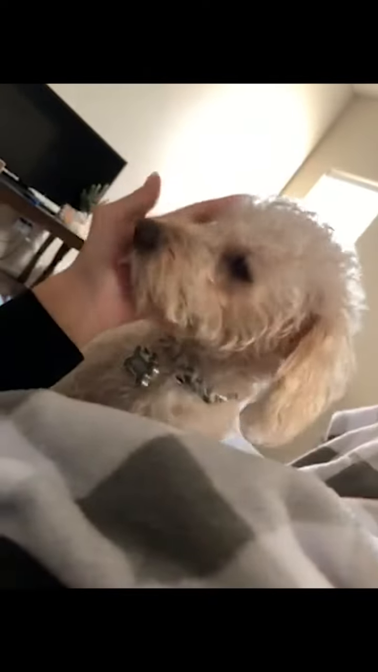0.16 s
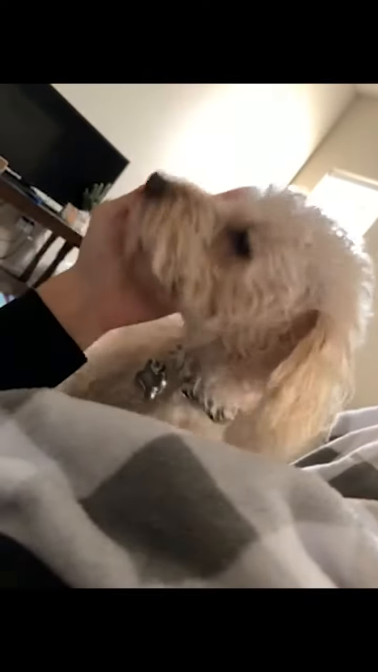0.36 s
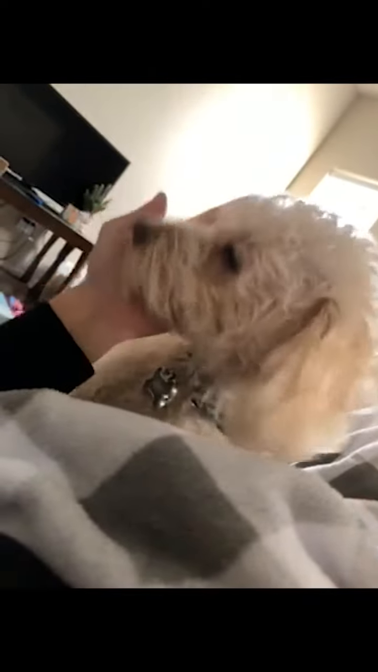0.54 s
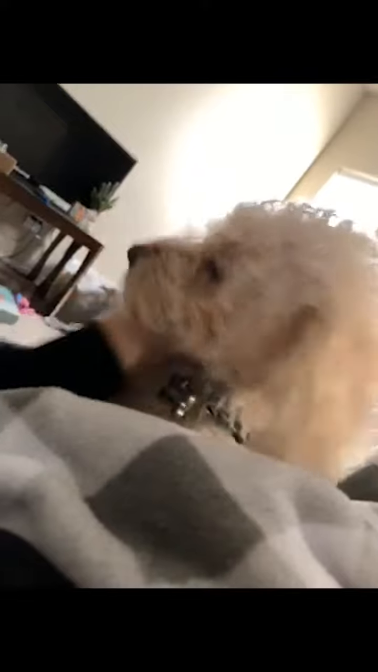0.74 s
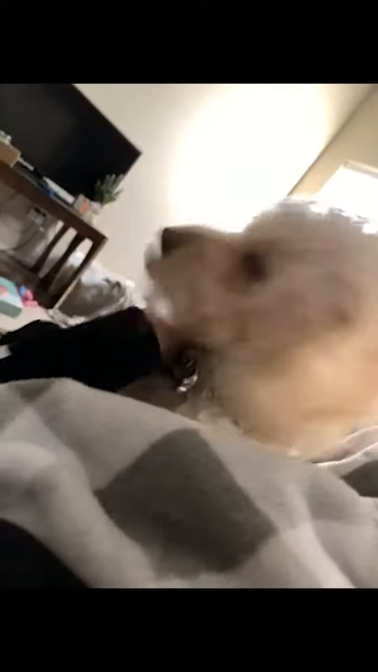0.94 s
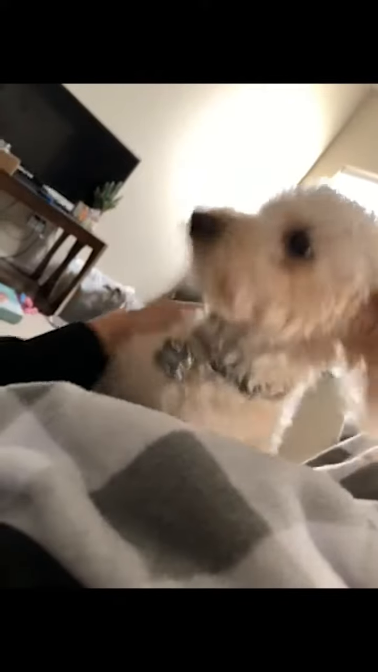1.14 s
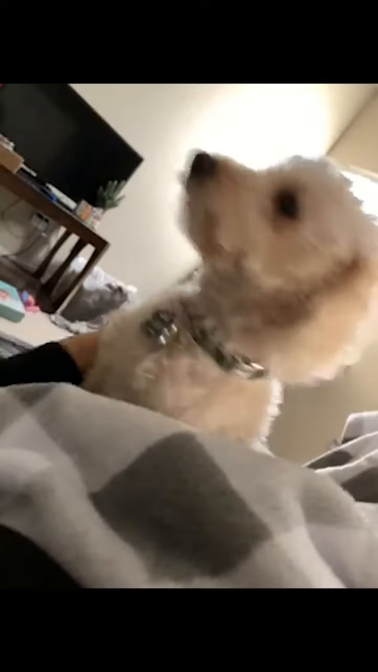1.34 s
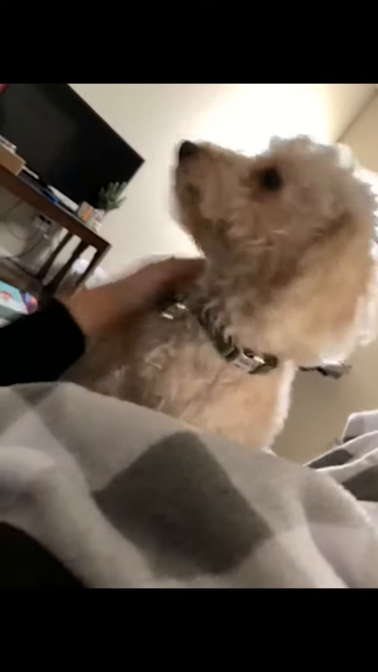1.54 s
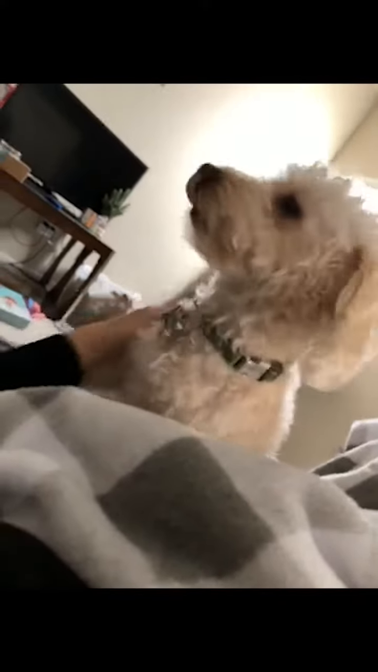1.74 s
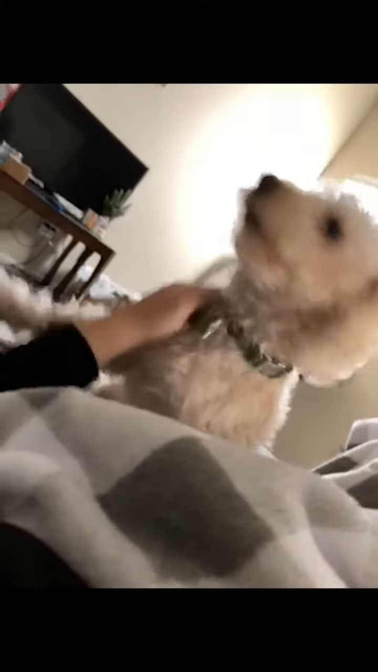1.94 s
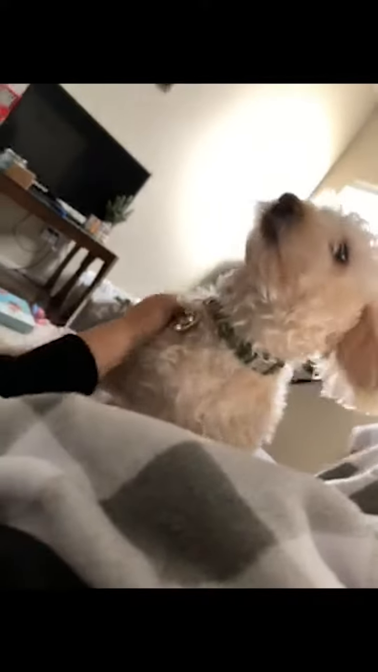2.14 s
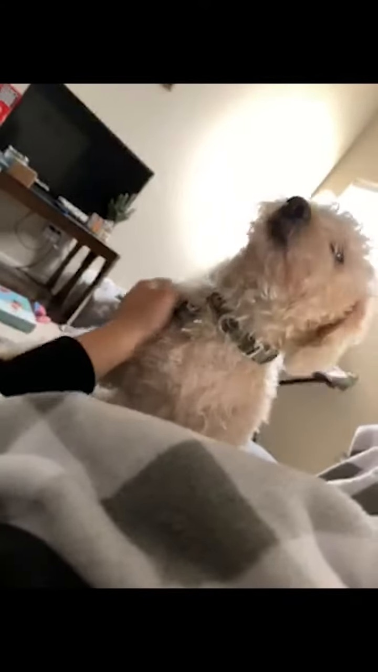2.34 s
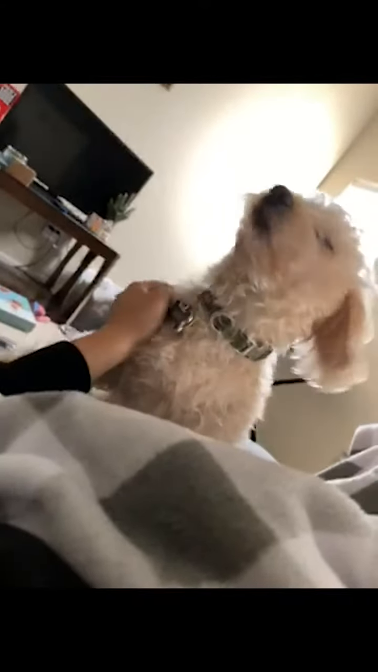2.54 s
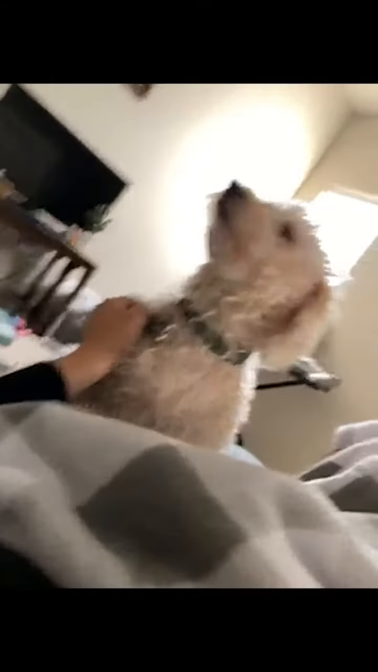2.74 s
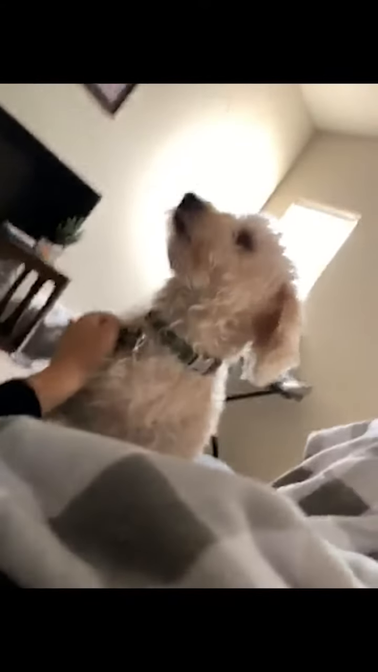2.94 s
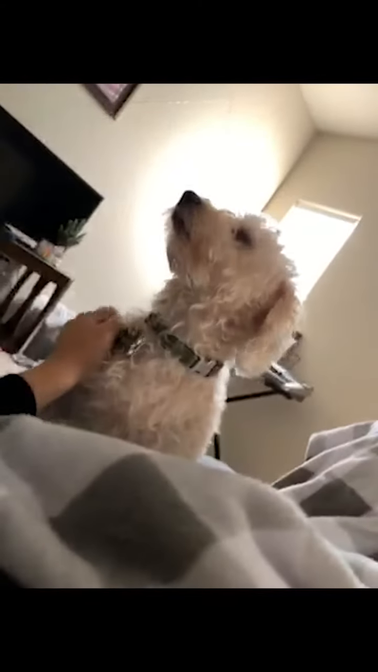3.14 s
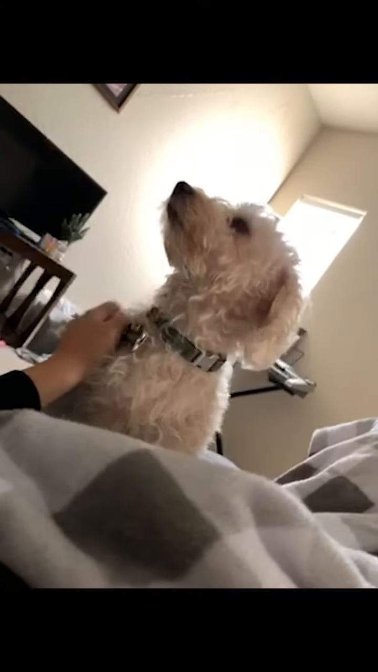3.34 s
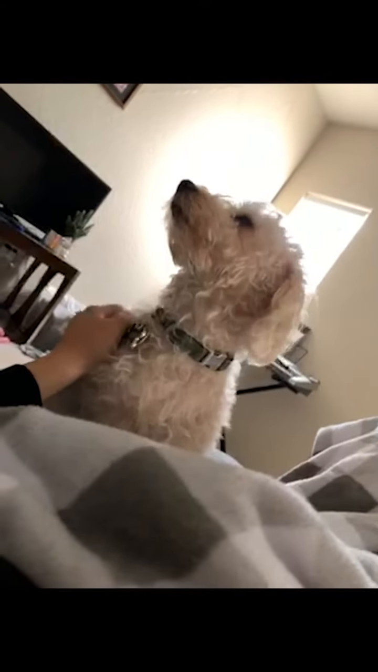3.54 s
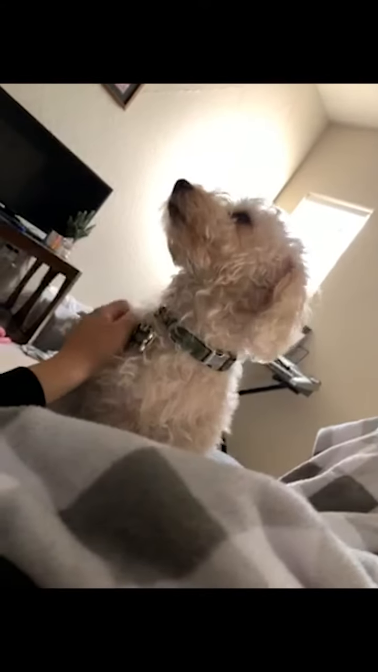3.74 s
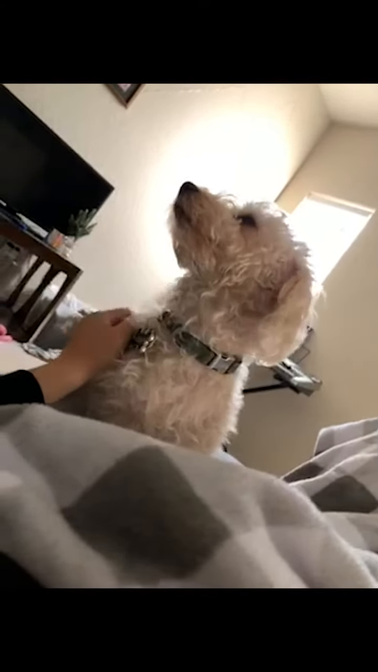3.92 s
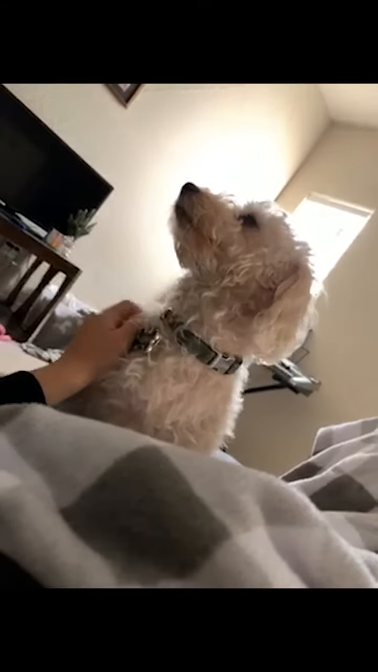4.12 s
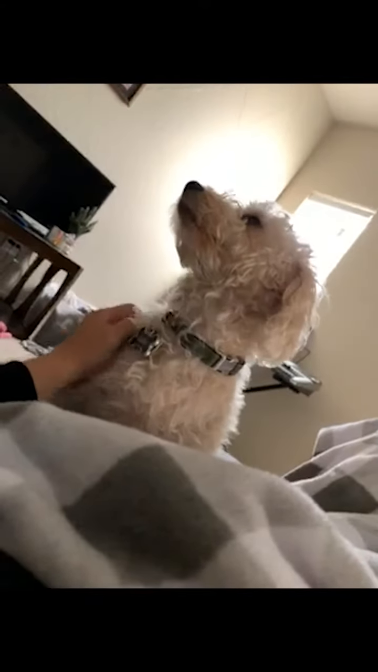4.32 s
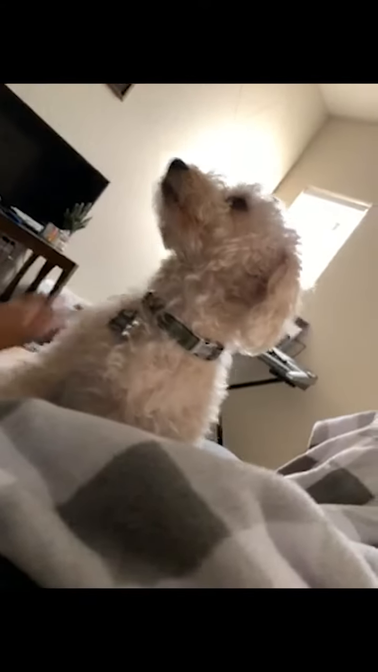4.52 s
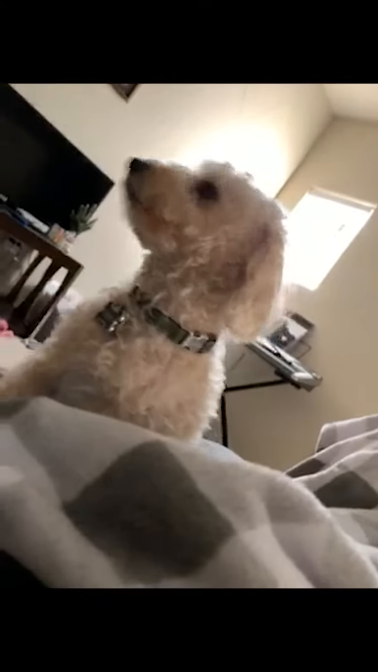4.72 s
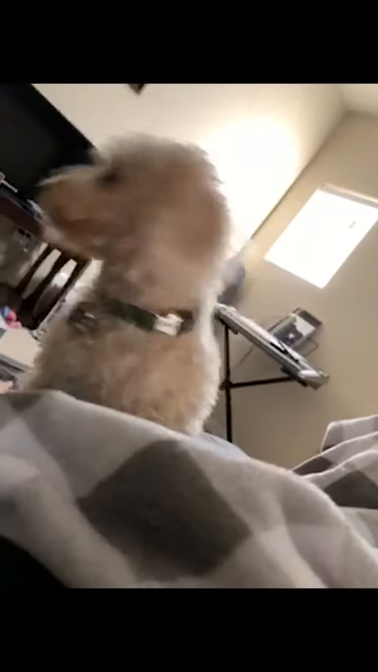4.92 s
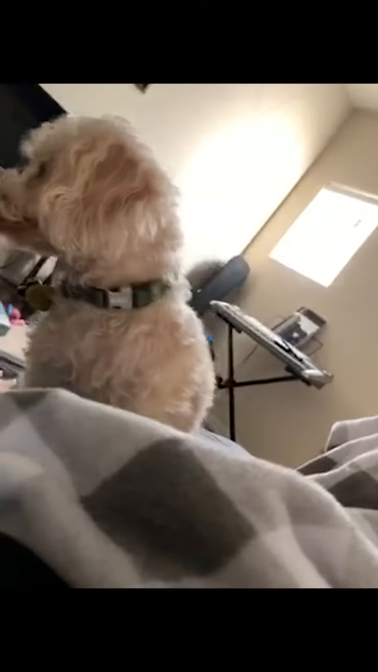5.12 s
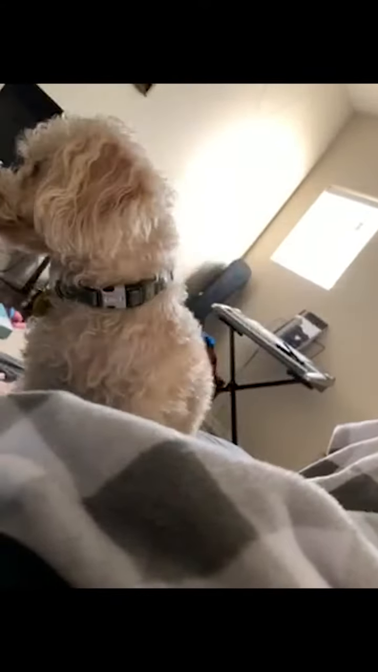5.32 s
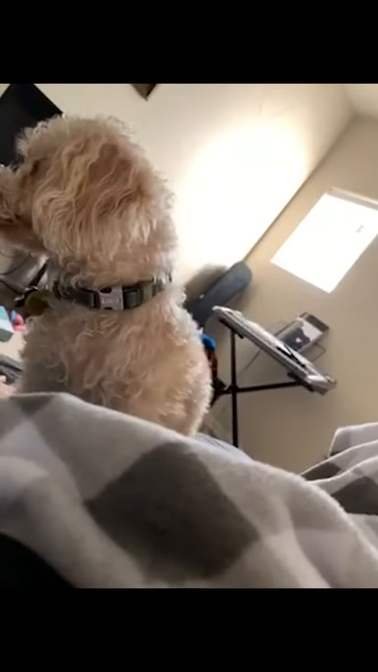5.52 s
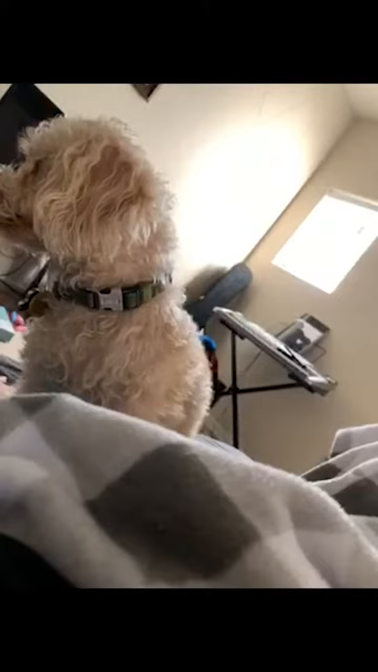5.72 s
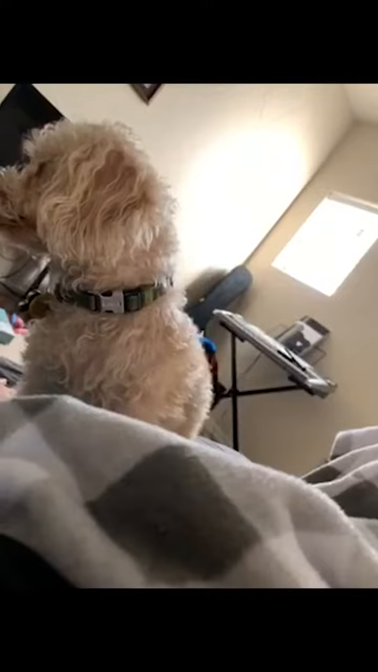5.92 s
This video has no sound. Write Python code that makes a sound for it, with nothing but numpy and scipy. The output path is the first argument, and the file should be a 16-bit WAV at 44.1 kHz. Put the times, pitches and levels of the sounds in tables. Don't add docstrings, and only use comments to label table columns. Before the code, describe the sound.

Brushing fur and dull bed bumps come first, with a few small metal ticks. The collar shakes and its tags rattle brightly and very briefly, loudest just before two seconds. Then only gentle, separate strokes and faint hiss remain. Small bumps gather before a deep, overloaded blow on the mattress, followed by blanket rustle, a tiny creak and near silence. Everything is close and dry, in a soft furnished room.

```python
import sys
import numpy as np
from scipy import signal
from scipy.fft import rfft, irfft
from scipy.io import wavfile
from scipy.ndimage import uniform_filter1d

SR = 44100
rng = np.random.default_rng(int(sys.argv[2]) if len(sys.argv) > 2 else 0)


def waveform_to_disk(signal):
    frames = np.transpose(np.atleast_2d(signal))
    scaled = np.clip(frames, -1, 1) * 32767
    samples = np.round(scaled).astype(np.int16)
    wavfile.write(sys.argv[1], SR, samples)


def makeup_ratio(level_db):
    decades = np.asarray(level_db, float) / 20
    return 10 ** decades


N = 263316

# (peak time [s], length [s], level [dB], pressure [dB])
STROKES = [(0.021, 0.079, -43.5, 8.5), (.2, 0.23, -61, 8.5), (.36, 0.14, -56, -6), (.68, 0.056, -52, -5.5),
           (.852, 0.094, -54, -3.5), (1.005, 0.11, -46.5, 1.5), (1.12, .16, -46.5, 0.5),
           (1.22, 0.28, -52, -5.5), (1.345, 0.1, -49, 0.5), (1.53, 0.097, -44, 1),
           (1.589, 0.082, -41.5, 4.5), (1.675, 0.056, -43.5, -2), (1.73, 0.074, -35, 1.5),
           (1.79, 0.11, -41.5, 0), (1.958, 0.1384, -39, 0), (2.07, 0.081, -42.5, 2),
           (2.14, 0.19, -45.5, -6), (2.43, 0.17, -50.5, -3), (2.655, 0.098, -58, -8),
           (2.776, 0.11, -51, -4), (2.87, 0.1, -56.5, 9.5), (3.211, 0.19, -53, -3), (3.606, .12, -48, -3),
           (3.953, 0.12, -48.5, -2.5), (4.187, 0.068, -60, -9), (4.334, 0.13, -51, -3.5),
           (4.453, 0.11, -51.5, -5), (4.62, 0.091, -61, 13), (4.75, 0.14, -54, 10),
           (4.92, 0.21, -63.5, 14.5)]
STROKE_RISE, STROKE_REST_DB = 0.49, -72
CREAK_SPREAD, CREAK_TONE = 7, 1.1


def evened(x):
    return x / np.sqrt(np.mean(x ** 2) + 1e-20)


def read(points, hz, column=1):
    table = np.transpose(points)
    return np.interp(np.log(hz + 1), np.log(table[0] + 1), table[column])


def add(mix, s, sound):
    part = mix[round(s * SR):][:len(sound)]
    part += sound[:len(part)]


def colour(x, spectrum):
    gain = makeup_ratio(read(spectrum, np.fft.rfftfreq(len(x), 1 / SR)))
    return evened(irfft(rfft(x) * gain, len(x)))


def lumpy(depth_db, ms):
    width = int(ms * SR / 1000)
    wander = uniform_filter1d(uniform_filter1d(rng.standard_normal(N), width), width)
    return rng.standard_normal(N) * makeup_ratio(depth_db * evened(wander))


def patchy(x, depth_db):
    z = signal.stft(x, nperseg=256)[2]
    field = uniform_filter1d(rng.standard_normal(z.T.shape), 8, 0)
    field = uniform_filter1d(field, 6, 1).T
    return evened(signal.istft(z * makeup_ratio(depth_db * evened(field)), nperseg=256)[1][:N])


def ring(x, hz, width_hz):
    r = np.exp(-np.pi * width_hz / SR)
    y = signal.lfilter([1, 0, -1], [1, -2 * r * np.cos(2 * np.pi * hz / SR), r * r], x)
    return y / abs(y).max()


def onset(t, rise_ms):
    return 1 - np.exp(-(t / rise_ms * 1000) ** 2)


def glide(db, above_hz, hz, glide_ms, t60, rise_ms):
    t, tau = np.arange(SR // 3) / SR, glide_ms / 1000
    turns = hz * t + above_hz * tau * (1 - np.exp(-t / tau))
    return makeup_ratio(db - 60 * t / t60) * np.sin(2 * np.pi * turns) * onset(t, rise_ms)


def swells(rows, db, rise, rest_db, square=1.71):
    t, power = np.arange(0, N + 64, 64) / SR, makeup_ratio(2 * rest_db)
    for (s, length, *_), level_db in zip(rows, db):
        u = (t - s) / length
        distance = abs(np.where(u < 0, u / rise, u / (1 - rise)))
        power = power + makeup_ratio(2 * level_db - 18.1 * distance ** square)
    return np.interp(np.arange(N) / SR, t, np.sqrt(power))


def swishes(rows, spread, tone=0):
    out = np.zeros(N)
    for (s, length, db, start_hz, end_hz), z in zip(rows, rng.standard_normal((len(rows), SR // 4))):
        n, r = int(length * SR), np.exp(-np.pi * spread * np.sqrt(start_hz) / SR)
        turn = np.exp(2j * np.pi * np.cumsum(np.geomspace(start_hz, end_hz, n)) / SR)
        fuzz = signal.lfilter([1], np.convolve([1, -r], [1, -r]), z[:n] / turn)
        size = abs(fuzz)
        band = evened((turn * (evened(size) * fuzz / size + tone)).real)
        fade = signal.windows.tukey(n, .5) * np.linspace(1.3, .6, n)
        add(out, s, makeup_ratio(db) * band * fade)
    return out


def tags():
    # (time [s], level [dB], ring [Hz], contact [ms])
    face = [(0.108, -38, 6670, 2.4), (0.6766, -20, 7330, 0.7), (1.098, -14.5, 6400, 0.45),
            (1.1, -19.5, 6300, 3.3), (1.1115, -18.5, 6600, 3.6), (1.115, -12.5, 6650, 0.58),
            (1.7149, 0.5, 7300, 1.3), (1.8023, 4, 6800, 0.61), (1.8205, -22, 7200, 2.3),
            (1.9678, -10, 6770, 6.3), (1.9735, -5, 6700, 1.9), (2.354, -30, 6360, 1.1),
            (2.3811, -27, 5500, 2.3)]
    # (time [s], level [dB], ring [Hz], contact [ms])
    edge = [(0.017, -27, 4530, 1.1), (0.1869, -35, 8000, 1.4), (0.7388, -36, 6740, 1.7),
            (0.8633, -30.5, 8000, 1.1), (0.8727, -36, 7840, 1.4), (1.649, -20.5, 9640, 0.7),
            (1.7208, 1, 6300, 1.3), (1.8025, -19.5, 5000, 1.596), (1.8083, -21.5, 7700, 1.8),
            (1.971, -19, 7060, 5), (2.0483, -7.5, 7700, 3.41), (2.0623, -11, 6060, 1.4),
            (2.0815, -23.5, 6510, 2.1)]
    # (time [s], level [dB], ring [Hz], contact [ms])
    slap = [(0.6599, -38, 7800, 1.8), (0.671, -41, 7150, 1.7), (1.0273, -16.5, 6800, 3.2),
            (1.658, 4.5, 6950, 4.4), (1.7095, 10.5, 6890, 4.2), (1.749, -17, 7400, 2.2),
            (1.786, -16.5, 6400, 0.95), (1.9466, -28, 6500, 1.4), (2.0066, -18.5, 7040, 4.6),
            (2.056, -10.5, 6540, 4.4), (2.065, -22, 6500, 2.5), (2.068, -23, 6070, 1.1),
            (2.1082, -13, 7060, 1.2), (2.141, -22.5, 6630, 1.4)]
    # (time [s], level [dB], ring [Hz], contact [ms])
    dull = [(0.1422, -40, 2900, 2.1), (0.657, -48, 6160, 4.2), (1.7231, -23.5, 6280, 8.9),
            (1.9964, -40, 5810, 1.6), (2.5294, -49, 5560, 1.7), (2.8748, -44, 6200, 0.64)]
    # (thud over ring [dB], fizz over ring [dB], rise [ms], opening blow [ratio])
    kinds = [
        (-18.5, -28.5, .6, 1.44),
        (-30, -10, .3, 3.4),
        (-13, -20.5, 0.37, 2.2),
        (6, -5, 0.26, 2.8),
    ]
    # (time [s], peak [dB], note [Hz], t60 [ms])
    ticks = [(0.234, -50, 5100, 30), (.362, -40, 6900, 15), (0.656, -34.5, 3070, 13),
             (1.084, -33, 2050, 14), (1.6602, -19, 7200, 4.9), (1.68, -17, 5930, 6), (1.689, -19, 7000, 10),
             (1.6975, -17, 6460, 10), (1.701, -11, 7300, 8.2), (1.706, -22, 6800, 12), (1.7149, 1, 7000, 4),
             (1.789, -13, 2700, 4.2), (1.802, -11.5, 14800, 3.5), (1.9688, -19, 7300, 5.3),
             (1.9966, -11, 2100, 4.9), (2.004, -25, 5200, 7), (2.007, -24, 2300, 11),
             (2.0355, -35, 6000, 8), (2.04, -29, 6600, 8), (2.052, -30, 3500, 9.9), (2.059, -20, 5440, 16),
             (4.531, -48.5, 1300, 18), (4.562, -33.5, 1260, 16), (4.588, -36, 1170, 22),
             (4.62, -39, 1150, 22), (4.651, -33, 1170, 22), (5.093, -39, 1480, 14), (5.113, -40, 944, 16),
             (2.11, -35, 3700, 7.5), (2.14, -26, 5470, 11), (2.214, -48, 4080, 59),
             (2.238, -44.5, 4040, 39), (2.048, -17.5, 2100, 6.4),
             (1.659, -14, 9050, 4), (1.658, -15, 13700, 4.5), (1.7163, -2.5, 7100, 6),
                 (1.7205, -10.5, 14900, 5), (1.7205, -8.5, 9300, 5), (1.7245, -14.5, 6500, 6),
                 (1.786, -19, 8600, 5), (1.791, -17, 3280, 9), (1.8015, -5, 15560, 5),
                 (1.8015, -12.5, 10900, 5), (1.8017, -8.5, 13440, 4.6), (1.804, -17.5, 2400, 7.5),
                 (1.808, -22, 13600, 4), (1.931, -21, 6550, 6), (1.938, -30, 6000, 6),
                 (1.9466, -28, 8500, 5), (1.9664, -10, 11500, 6), (1.9715, -22, 15000, 6),
                 (1.9745, -18, 4300, 8.7), (1.985, -30, 14000, 4), (2.007, -27, 9000, 8),
                 (2.048, -6, 15020, 6), (2.049, -11, 11500, 7), (2.048, -11, 9400, 7.3),
                 (2.062, -14, 15000, 5), (2.062, -20, 9000, 5), (2.0815, -26, 9300, 6),
                 (2.108, -18, 9200, 5.4), (2.141, -22, 9600, 4), (2.141, -23, 3880, 8),
                 (2.146, -45, 5000, 60), (2.15, -42, 4000, 50), (.1427, -29, 3700, 9.2),
                 (.33, -45, 5400, 30)]
    out, t = np.zeros(N), np.arange(700) / SR
    for rows, (thud_db, fizz_db, rise_ms, blow) in zip([face, edge, slap, dull], kinds):
        noises = rng.standard_normal((len(rows), 3, len(t)))
        for (s, db, hz, ms), (a, b, c) in zip(rows, noises):
            contact = np.exp(-(t / (0.32 * ms / 1000)) ** 1.2) + 0.03 * np.exp(-t / 0.0061)
            contact = contact * onset(t, rise_ms)
            first = blow * (t < 1.5 / SR)
            note = ring(ring(a * contact + first, hz, 1099.4), hz, 2920)
            push = np.diff(b * contact + 0.4 * first, prepend=0)
            thud = ring(ring(push, 4450, 2817), 3640, 2900)
            fizz = ring(ring(c * contact ** 1.4 + 0.43 * first, 13500, 8000), 11000, 9000)
            add(out, s, makeup_ratio(db) * (note + makeup_ratio(thud_db + 2.5) * thud + makeup_ratio(fizz_db + 12.0) * fizz))
    t = np.arange(SR // 8) / SR
    for s, db, hz, t60_ms in ticks:
        add(out, s, makeup_ratio(db - 60000 * t / t60_ms) * np.sin(2 * np.pi * hz * t) * (1 - np.exp(-t / 0.000866)))
    return out


def rolls():
    # (peak time [s], level [dB], note [Hz], half width [ms])
    rolling = [(1.9669, -5.5, 6850, 0.5), (1.9742, -8, 6600, .6), (2.1086, -8, 7100, 0.46),
               (2.1086, -23, 4400, .4), (2.1086, -18, 5900, .5), (2.0563, -24.5, 3400, 0.47),
               (2.0484, -6, 8300, 0.28), (1.7208, -6.5, 9300, 0.401), (1.6581, -7.5, 11500, 0.13),
               (2.0052, -27, 5500, .6), (2.1416, -19, 6800, 0.57), (2.1416, -23.5, 5500, .8),
               (1.7493, -15, 6800, .35), (2, -18.5, 6500, .6), (2.0573, -15.5, 6500, 1),
               (2.0818, -27, 6500, 0.83), (1.9471, -25, 6500, .6), (2.3812, -30, 5150, 0.96),
               (2.3546, -33.5, 6260, 0.88), (.0172, -32, 4380, 1.1), (0.0165, -34, 5400, 1),
               (.0172, -35, 7000, 1), (.1435, -36, 2900, 0.7), (.1088, -42, 6500, 1.4),
               (1.7101, -14.5, 2600, 1.1), (1.7101, -18.5, 1400, 1.1), (1.69, -25, 7200, 0.59),
               (1.7137, -7, 7000, .35), (1.7166, -7, 7100, .6), (2.875, -40.5, 10300, .5),
               (2.875, -46, 6000, 0.76), (.6768, -28, 10200, .3)]
    out, t = np.zeros(N), np.arange(-150, 250) / SR
    for s, db, hz, ms in rolling:
        swell = np.exp(-(t / np.where(t < 0, 1, 1.5) / ms * 1000) ** 2)
        add(out, s + t[0], makeup_ratio(db) * swell * np.cos(2 * np.pi * hz * t))
    return out


def bedroom(x):
    t = np.arange(SR // 4) / SR
    tail = rng.standard_normal(len(t)) * makeup_ratio(-60 * t / 0.323) * (t > .003)
    return signal.fftconvolve(x, tail / np.linalg.norm(tail))[:N]


def rattle():
    level = swells(STROKES, np.transpose(STROKES)[2], STROKE_RISE, STROKE_REST_DB)
    shaken = np.clip((20 * np.log10(level) + 51.0) / 14, 0, 1.5)
    draw, size, which = rng.random(N), rng.exponential(1, N), rng.integers(0, 6, N)
    struck = draw < 260 * shaken / SR
    hits = struck * level * makeup_ratio(6.5 + 2.57 * np.minimum(size, 1.5))
    t, out = np.arange(300) / SR, np.zeros(N)
    for k, hz in enumerate([4900, 5930, 6400, 6800, 7060, 7950]):
        tap = makeup_ratio(-60 * t / 0.0025) * np.sin(2 * np.pi * hz * t) * (1 - np.exp(-t / 0.00027))
        out += signal.oaconvolve(hits * (which == k), tap)[:N]
    return out


def fur():
    # (frequency [Hz], level [dB])
    low = [(700, -33), (1400, -6.5), (2200, -3), (3600, -6.5), (5200, -17)]
    # (frequency [Hz], level [dB])
    mid = [(3800, -12.5), (5100, -5), (5900, -0.5), (7000, -2.5), (7900, -4.5), (8800, -9), (11000, -62.5)]
    # (frequency [Hz], level [dB])
    high = [(7500, -34), (9500, -2.5), (12500, -5.5), (16000, -9), (18000, -38.5)]
    slips, drag = patchy(lumpy(2.2, 2.5), 2.4), patchy(lumpy(2.2, 4), 2.2)
    db, pressure_db = np.transpose(STROKES)[2:]
    drag_db, fizz_db = db - 4.5 + pressure_db, db - 8.5 - pressure_db
    mix = swells(STROKES, db, STROKE_RISE, STROKE_REST_DB) * colour(slips, mid)
    mix += swells(STROKES, drag_db, STROKE_RISE, STROKE_REST_DB - 7.0) * colour(drag, low)
    return mix + swells(STROKES, fizz_db, STROKE_RISE, STROKE_REST_DB + 1.5) * colour(slips, high)


def thump():
    # (time [s], peak [dB], start above settled note [Hz], settled note [Hz], t60 [s])
    waves = [
        (4.7325, 3, 48, 234, 0.044),
        (4.7368, -3.5, 70, 531, 0.045),
        (4.7436, 4, 238, 62.1, 0.13),
        (4.744, -0.5, 85, 158.5, 0.15),
        (4.7547, -6, 10, 109.2, 0.096),
        (4.761, -13, 6.4, 60.15, 0.97),
        (4.7636, 4.5, 6.7, 80, 0.075),
        (4.914, -12.5, 27, 83, 0.34),
    ]
    # (frequency [Hz], level [dB], t60 [s])
    tail_bands = [(58, -13.5, 0.41), (243, -14.5, 0.29), (613, -24, 0.11), (1200, -40.5, 0.41),
                  (3000, -45, 0.28), (7000, -65.5, 0.059)]
    out = np.zeros(N)
    for s, db, above_hz, hz, t60 in waves:
        add(out, s, glide(db, above_hz, hz, 3.3, t60, 0.435))
    hz, t, z = signal.stft(rng.standard_normal(SR // 2), SR, nperseg=512)
    t60 = read(tail_bands, hz, column=2)[:, None]
    z = z * makeup_ratio(read(tail_bands, hz)[:, None] - 60 * t / t60)
    tail = signal.istft(z, SR, nperseg=512)[1]
    t, bass = np.arange(len(tail)) / SR, uniform_filter1d(uniform_filter1d(tail, size=40), size=40)
    crack = (tail - bass) * (1 + 1.53 * np.exp(-t / 0.016)) * np.minimum(t / 0.0074, 1)
    boom = bass * np.minimum(t / 0.0071, 1) ** 2
    add(out, 4.727, makeup_ratio(23.0) * (crack + boom))
    return out


def bed():
    # (peak time [s], length [s], mattress shake [dB], blanket rustle [dB])
    shifts = [(0.108, 0.45, -31, -44.5), (0.42, 0.06, -29.5, -39.5), (0.513, 0.073, -33, -36.5),
              (0.604, 0.11, -31, -31), (0.817, 0.28, -30, -40.5), (1.009, 0.18, -32.5, -37),
              (1.11, 0.14, -27, -38), (1.387, 0.32, -31, -35.5), (1.55, 0.1, -33.5, -36.5),
              (1.724, 0.25, -30.5, -44.5), (1.871, 0.09, -31, -49.5), (1.985, 0.16, -36, -49),
              (2.166, 0.25, -31.5, -35.5), (2.29, 0.52, -33.5, -47), (2.59, 0.23, -31.5, -46.5),
              (2.815, 0.3, -32.5, -48.5), (3.25, 0.23, -30.5, -60), (3.598, 0.23, -34, -50),
              (3.856, 0.37, -33, -53.5), (4.065, 0.056, -29.5, -53.5), (4.345, 0.65, -36, -54),
              (4.567, .16, -27, -37.5), (4.648, 0.14, -29, -35), (4.758, 0.12, -30, -20),
              (4.851, .2, -23, -29.5), (5.106, 0.22, -26, -34.5), (5.434, 0.24, -37, -56),
              (5.675, 0.12, -51, -61.5), (5.761, 0.022, -38.5, -63), (5.945, 0.13, -40, -56)]
    # (frequency [Hz], level [dB])
    shake = [(18, -53), (32, -40), (40, -20), (58, 7), (80, 2.5), (125, -6), (170, -15.5), (300, -52)]
    # (frequency [Hz], level [dB])
    rustle = [(30, -22), (90, 9.5), (170, 9.5), (300, 4.5), (500, -4.5), (900, -18), (1600, -27.5),
              (3000, -59)]
    # (time [s], peak [dB], settled note [Hz], t60 [s])
    knocks = [(0.402, -19, 226, 0.044), (0.49, -24, 215, 0.075), (0.557, -23, 250, 0.069),
              (0.595, -19, 218, 0.075), (0.614, -45, 213, 0.044), (0.966, -32, 227, 0.11),
              (1.1, -22, 277, 0.05), (1.296, -27, 322, 0.098), (1.342, -27, 283, 0.098),
              (1.4, -24.5, 298, 0.097), (1.462, -28, 375, 0.092), (1.521, -22.5, 231, 0.055),
              (1.542, -21, 243, 0.067), (2.104, -31.5, 330, 0.081), (2.194, -36.5, 207, 0.059),
              (2.571, -29, 295, 0.093), (2.731, -31.5, 203, 0.1), (4.532, -20.5, 293, 0.069),
              (4.564, -23, 312, 0.088), (4.59, -23.5, 305, 0.072), (4.62, -23, 280, 0.095),
              (4.654, -22.5, 337, 0.063), (4.711, -22, 263, 0.045), (5.036, -38, 298, 0.035),
              (5.053, -30, 282, 0.041), (5.148, -34, 302, 0.094), (5.114, -18, 257, 0.06),
              (5.195, -29.5, 228, 0.062)]
    rise, still_shake_db, still_rustle_db = 0.369, -42, -55.5
    shake_db, rustle_db = np.transpose(shifts)[2:]
    out = swells(shifts, shake_db, rise, still_shake_db, 1.6) * colour(lumpy(0.89, 21), shake)
    folds = colour(lumpy(3.5, 5), rustle)
    out += swells(shifts, rustle_db + 1.5, rise, still_rustle_db, 2.03) * folds
    t = np.arange(SR // 8) / SR
    for (s, db, hz, t60), z in zip(knocks, rng.standard_normal((len(knocks), len(t)))):
        add(out, s, glide(db + 12.5, 1625, 1.052 * hz, 1.246, 0.4 * t60, 4.72))
        burst = z * makeup_ratio(-60 * t / (1.2 * t60)) * np.minimum(t / 0.0037, 1)
        crumple = ring(ring(burst, 1.85 * hz, 270), 350, 560)
        add(out, s, makeup_ratio(db - 16.0) * crumple)
    return out


def blanket():
    # (time [s], peak [dB], note [Hz], t60 [s])
    bumps = [(2.119, -34, 626, 0.036), (2.125, -24, 172, 0.065), (2.145, -26, 323, 0.034),
             (2.163, -37, 800, .03), (2.178, -37, 760, .05), (2.196, -24, 550, 0.023),
             (2.218, -37, 620, .04), (2.233, -39, 450, .04), (2.265, -36, 348, 0.044),
             (2.292, -36, 550, .03), (4.708, -36, 1090, .02), (4.708, -25, 560, 0.044),
             (4.778, -21, 330, .05), (4.807, -25, 324, 0.065), (4.836, -33.5, 746, 0.04),
             (5.008, -43, 904, .03), (5.033, -37, 480, .03), (5.053, -41, 870, .03),
             (5.089, -32, 418, 0.046), (5.099, -42, 647, 0.02), (5.114, -27, 665, 0.015),
             (5.147, -39.5, 1430, 0.027), (5.164, -21, 248, 0.035), (5.196, -44, 1300, 0.024),
             (5.217, -33, 450, 0.036)]
    # (time [s], length [s], level [dB], start [Hz], end [Hz])
    rubs = [(0.001, .071, -47.5, 3310, 2410), (0.001, .061, -48.5, 7810, 7010),
            (0.002, .062, -45.5, 1710, 1310), (0.001, .072, -49.5, 5310, 5010),
            (.231, .091, -57.5, 4310, 4110), (.226, .071, -49.5, 855, 785), (.961, .241, -51.5, 6710, 7010),
            (1.181, .221, -52.5, 6910, 6510), (1.561, .071, -47.5, 2510, 2110),
            (1.571, .061, -47.5, 4010, 3610), (2.381, .201, -60.5, 11410, 11010),
            (2.331, .241, -59.5, 9110, 9010), (4.906, .031, -49.5, 1255, 1105), (1.96, .08, -48, 620, 520)]
    # (time [s], length [s], level [dB], start [Hz], end [Hz])
    squeaks = [
        (.143, 0.014, -48.5, 3300, 1700),
        (.144, 0.0287, -45.5, 1550, 374),
        (.23, .03, -57, 5000, 5500),
        (.04, .03, -47, 905, 350),
    ]
    out = swishes(rubs, 11.2) + swishes(squeaks, CREAK_SPREAD, CREAK_TONE)
    for s, db, hz, t60 in bumps:
        add(out, s, glide(db + 1.0, 0.62 * hz, hz, 1.4, t60, 2.4))
    return out


def cloth_and_creaks():
    # (time [s], length [s], level [dB], start [Hz], end [Hz])
    cloth = [(0, 0.1, -43, 910, 330), (0, 0.044, -44, 11900, 11000), (.14, 0.048, -45, 1470, 300),
             (0.22, 0.12, -50, 710, 620), (1.505, 0.17, -46.5, 4300, 3000), (1.715, 0.065, -35, 4250, 3830),
             (1.655, 0.15, -40, 12800, 14200), (2.1, 0.12, -47, 636, 438), (1.935, 0.19, -51, 1290, 850),
             (2.135, 0.062, -44, 9650, 8950), (4.598, 0.11, -50, 1200, 1010)]
    # (time [s], length [s], level [dB], start [Hz], end [Hz])
    creaks = [
        (4.868, 0.03, -47.5, 2750, 950),
        (4.935, 0.014, -53, 1660, 1400),
    ]
    return swishes(cloth, 24.4) + swishes(creaks, CREAK_SPREAD, CREAK_TONE)


def hiss():
    # (frequency [Hz], level [dB per Hz])
    spectrum = [(180, -2.5), (300, -3), (419, -4.5), (504, -7.5), (1350, -15), (14100, -24), (15500, -25.5),
                (16400, -41.5)]
    return makeup_ratio(-51.5) * colour(rng.standard_normal(N), spectrum)


def scene():
    clacks = tags() + rolls()
    clacks = clacks + makeup_ratio(-19.5) * bedroom(clacks)
    steady = hiss() + fur() + cloth_and_creaks()
    lowpass = signal.firwin(511, 15950, window=("kaiser", 8), fs=SR)
    softened = signal.oaconvolve(steady + .8 * clacks, lowpass, "same")
    return (.2 * clacks + rattle() + softened + bed() + thump() + blanket())[None]


def low_pass(x):
    return signal.sosfilt(signal.butter(12, 15900, fs=SR, output="sos"), x)


def record(dry):
    lowpass = signal.firwin(511, 16450, window=("kaiser", 8), fs=SR)
    limited = signal.oaconvolve(dry, lowpass[None], "same")
    power_db = 10 * np.log10(abs(uniform_filter1d(limited[0] ** 2, 900, origin=449)) + 1e-12)
    fall = np.arange(N) * 49.0 / SR
    held_db = np.maximum.accumulate(power_db + fall) - fall
    over_db = np.maximum(held_db + 29.0, 0)
    ducked = limited / makeup_ratio(.12 * uniform_filter1d(over_db, 400, origin=199))
    return low_pass(np.clip(ducked, -1, 1))


dry = scene()
out = record(dry)
waveform_to_disk(out)
```